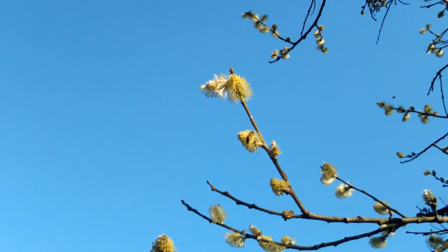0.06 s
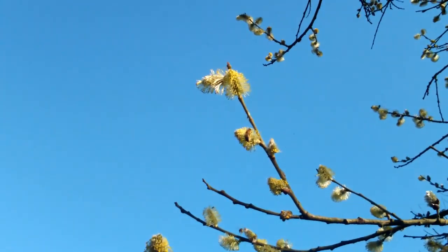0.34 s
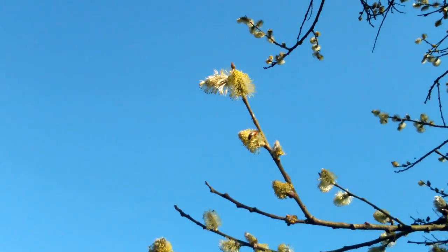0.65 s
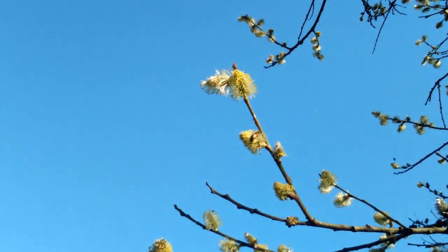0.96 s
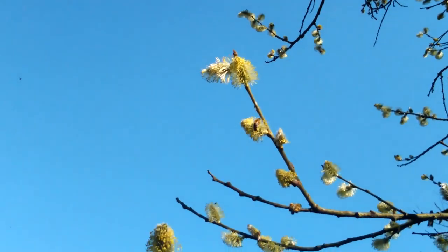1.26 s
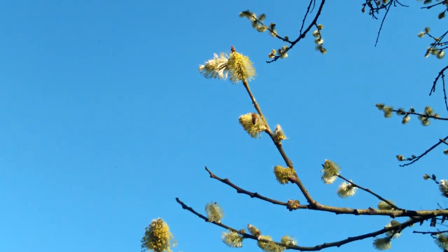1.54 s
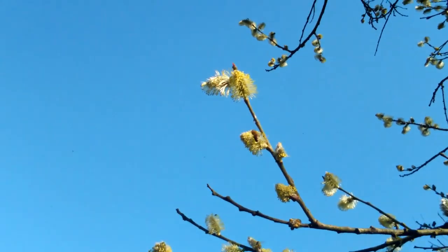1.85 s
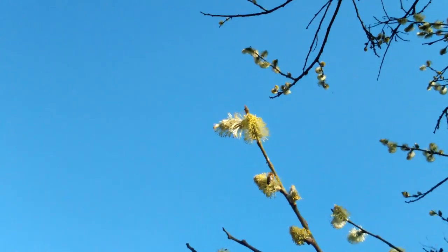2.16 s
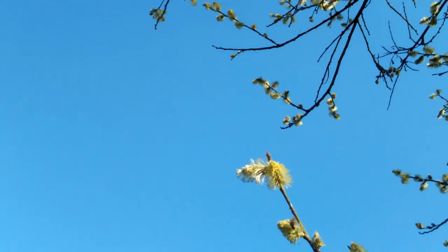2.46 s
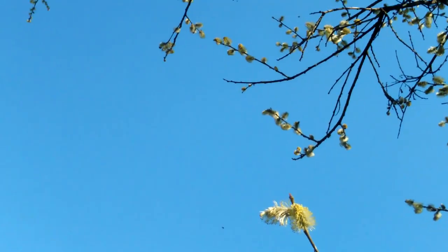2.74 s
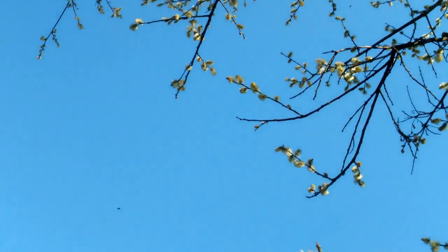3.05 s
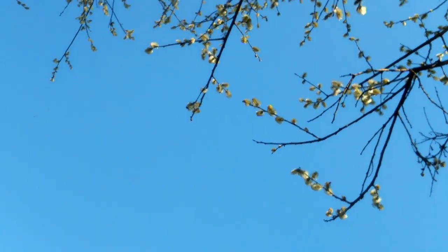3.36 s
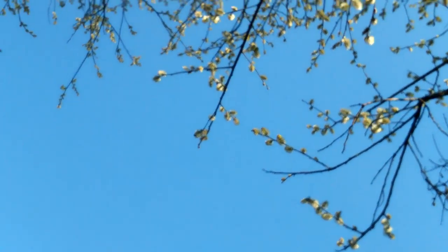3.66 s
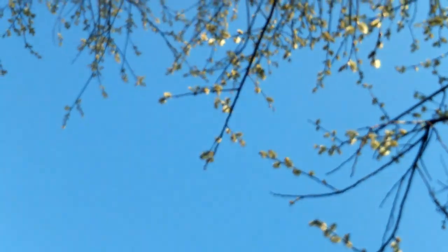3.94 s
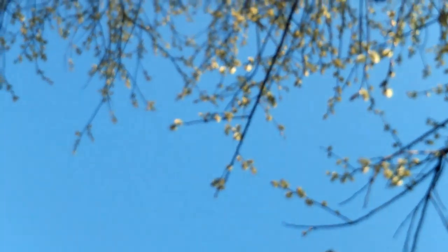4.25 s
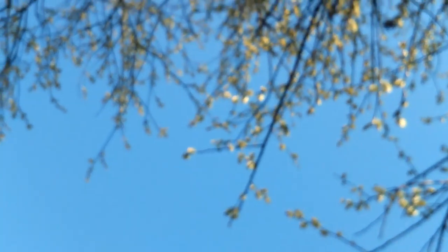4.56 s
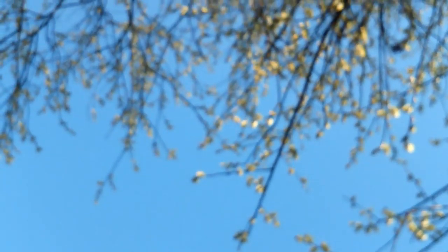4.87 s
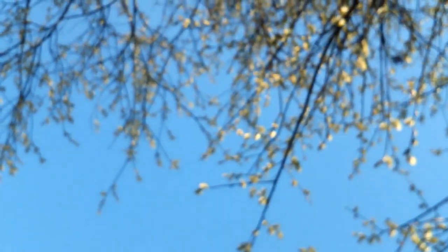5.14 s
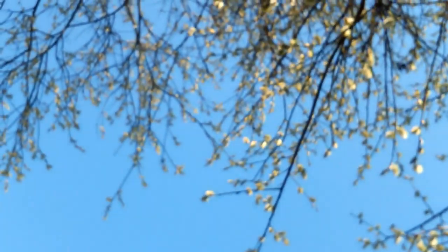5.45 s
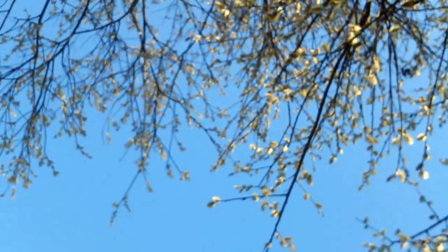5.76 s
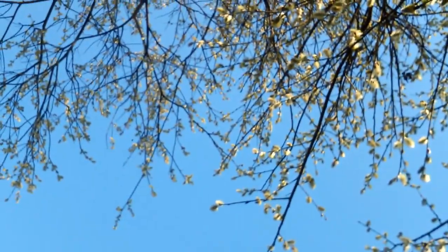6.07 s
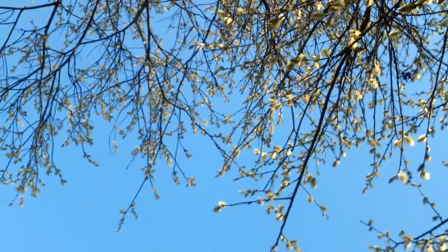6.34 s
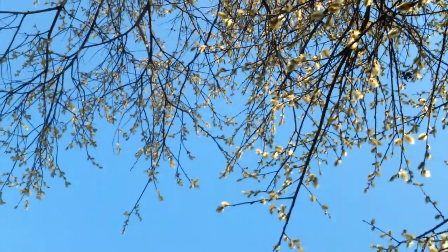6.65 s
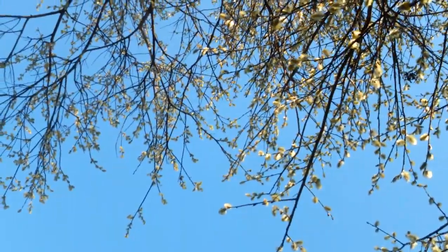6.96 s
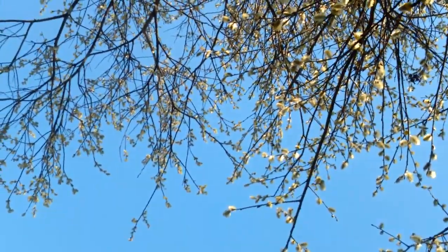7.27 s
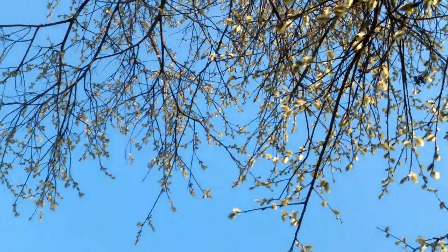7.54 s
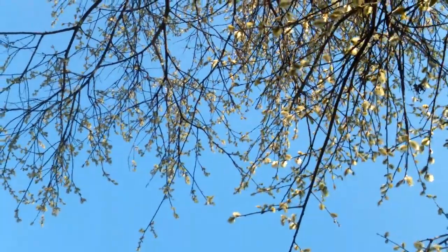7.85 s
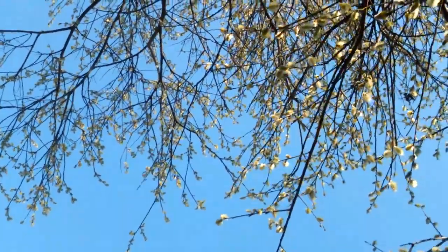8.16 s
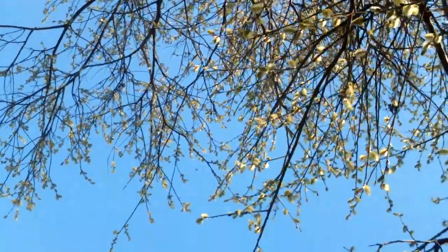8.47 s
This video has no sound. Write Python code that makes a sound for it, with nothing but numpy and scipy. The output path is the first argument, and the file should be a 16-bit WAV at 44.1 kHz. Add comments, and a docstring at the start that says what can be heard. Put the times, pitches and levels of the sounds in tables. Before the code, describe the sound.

Many bees hum softly and steadily throughout, some metres overhead in a flowering willow, blended with faint distant outdoor noise and a thin hiss. A light breeze rumbles on the hand-held microphone, louder than the bees. It starts with single low bumps around 1 second and a small puff at 2.5 seconds. From about 4.3 to 7 seconds it comes in short, fluttering gusts, and the strongest thump lands at 7.6 seconds, followed by a few lighter bumps. Right at the microphone, the hand makes small noises: a tiny bright tick at 0.7 seconds, two soft knocks just after 2 seconds, a sharper click at 3.4 seconds and a faint tick near 6.8 seconds. Around 8 seconds come a dull knock and a brief, faint finger rub, then more soft knocks and a tick at about 8.4 seconds.

```python
"""Dozens of bees work a flowering willow, their wingbeats merging into one soft hum.
The microphone is a hand-held phone some metres below them. A light breeze rises and falls on it,
bumping it with lone eddies and with gusts that are trains of eddies.
Far outdoor noise and the microphone's hiss lie beneath; right at the microphone,
the hand on the case makes a few ticks, knocks and short rubs."""
import sys
import numpy as np
from scipy import signal
from scipy.fft import rfft, irfft, next_fast_len
from scipy.io import wavfile

SR = 44100
rng = np.random.default_rng(int(sys.argv[2]) if len(sys.argv) > 2 else 0)


def transcribe(signal):
    """Save signal, clipped to [-1, 1], as a 16-bit WAV file at the path in sys.argv[1]."""
    frames = np.atleast_2d(signal).T
    limited = np.clip(frames, -1, 1)
    pcm = np.round(limited * 32767).astype(np.int16)
    wavfile.write(sys.argv[1], SR, pcm)


N = 379260
TIME = np.arange(N) / SR
HIGH_CUT_HZ = 15800
GUST_SAG_DB_PER_S = 11

# far outdoor noise: frequency_hz, relative_db
FAR_SPECTRUM = [(30, -16), (80, 11), (170, 3), (340, 0.5), (600, -2.5), (800, -2), (1100, 0.5), (1500, -2),
                (2000, -5), (2700, -10), (3400, -11), (4500, -19.5), (8000, -29.5)]
# its slow swell: time_s, level_db
FAR_SWELL = [(0, -60.5), (2.0, -61.5), (5.2, -60.5), (7.15, -58.7), (7.7, -61.5), (8.6, -61)]
# the microphone's own hiss: frequency_hz, relative_db
HISS_SPECTRUM = [(100, -13.5), (3000, -2), (5500, -3), (7000, -2), (8700, -0.5), (11000, -1.2), (13000, -1),
                 (15500, -3.5)]
# ticks of the case: start_s, peak_db, centre_hz
CASE_TICKS = [(.7070, -40, 10000), (3.4157, -29, 9400), (5.1854, -54, 12460), (6.765, -48, 10490),
              (7.9215, -52, 10000), (8.4317, -35.5, 12500)]
# soft knocks of a finger: start_s, peak_db
FINGER_KNOCKS = [(2.05, -44), (2.232, -44), (3.417, -46), (7.9213, -35.5), (8.355, -43), (8.434, -47)]
# the ring of the knocked case: pitch_hz, relative_db, t60_s
CASE_MODES = [(200, -7, .06), (330, 1, 0.029), (990, 0.5, 0.0055), (1630, 3, 0.0061), (2940, -22, 0.004)]
# a finger sliding on the case: start_s, length_s, level_db
FINGER_RUBS = [(7.95, 0.2, -58.5), (8.34, 0.019, -59)]
# its dull scrape: frequency_hz, relative_db
SCRAPE_SPECTRUM = [(200, 4), (800, -4), (1700, -1), (3000, -6), (5000, -14.5), (12000, -34)]
# its bright skin hiss: frequency_hz, relative_db
SKIN_SPECTRUM = [(4000, -26), (7000, -9), (9500, -1), (12000, -9), (15000, -14)]
# the breeze on the microphone: time_s, level_db
BREEZE_LEVEL = [(0, -61), (2.1, -58.5), (2.62, -47), (3.15, -54.5), (4.0, -52.5), (4.8, -44.5),
                (5.15, -48.5), (5.8, -48.5), (6.42, -41.5), (6.62, -48), (7.5, -51.5), (7.72, -46),
                (7.92, -50.5), (8.6, -52)]
# its rumble: frequency_hz, relative_db
RUMBLE_SPECTRUM = [(15, -31), (28, -34), (40, -1.5), (54, 6.5), (75, -1.5), (105, -9.5), (150, -15.5),
                   (220, -26), (350, -51), (700, -67)]
# lone eddies bumping the microphone: centre_s, peak_db, pitch_hz
LONE_EDDIES = [(0.862, -39.5, 73), (1.12, -33, 96), (1.445, -39, 69), (1.785, -48, 72), (2.55, -33.5, 72.5),
               (3.457, -38.5, 64.7), (3.746, -42, 66), (4.145, -37, 61), (4.345, -35.5, 77.5),
               (4.87, -33, 70.6), (5.253, -32, 85), (6.665, -39.5, 67.95), (6.866, -35.5, 68),
               (7.0, -38, 66), (7.226, -38, 83.9), (7.363, -37.5, 80.5), (7.619, -23, 82.05),
               (7.841, -35.5, 58), (7.994, -38, 76.1), (8.205, -39, 70.4), (8.489, -37.5, 60.4)]
# fine whirls fluttering inside a fast eddy: frequency_hz, relative_db
WHIRL_SPECTRUM = [(70, -16), (140, 8), (200, 0.5), (300, -9), (380, -12.5), (520, -22), (900, -57)]
# gusts, each a swell of rumble with a train of eddies: start_s, length_s, first_eddy_db, pitch_hz
WIND_GUSTS = [(2.475, .06, -43.5, 102), (4.479, 0.19, -40.5, 68), (5.361, 0.24, -33.5, 74),
              (5.735, .15, -27.5, 68), (6.001, 0.23, -39, 72.15), (6.288, 0.23, -30.5, 72.6),
              (7.589, 0.136, -29.5, 89)]
# the bees overhead, heard from below: time_s, mean_wingbeat_hz, level_db
SWARM_HUM = [(0, 235, -63), (1.2, 233.5, -62), (1.9, 241.3, -62), (4.2, 239, -62.5), (5.5, 243.7, -63),
             (7.0, 237.1, -62), (8.6, 240.6, -62)]
# one honeybee's buzz: wingbeat_multiple, relative_db
BUZZ_HARMONICS = [(1, -2), (2, -1), (3, -9), (4, -17), (5, -13.5), (6, -13.5), (8, -19), (12, -28),
                  (16, -35)]


def undb(db):
    """Decibels to gain."""
    return 10 ** (np.asarray(db) / 20)


def unit(x):
    """Scale to rms 1."""
    return x / np.sqrt(np.mean(x ** 2))


def curve(rows, column=1):
    """One column of a table, joined by straight lines in time."""
    rows = np.array(rows)
    return np.interp(TIME, rows[:, 0], rows[:, column])


def colour(x, spectrum):
    """Filter a sound by rows of frequency_hz, relative_db; the result has rms 1."""
    hz, db = np.transpose(spectrum)
    size = next_fast_len(N)
    bin_hz = np.maximum(np.fft.rfftfreq(size, 1 / SR), 1)
    gain = undb(np.interp(np.log(bin_hz), np.log(hz), db))
    return unit(irfft(rfft(x, size) * gain, size)[:N])


def drift(per_s, size=512):
    """Random values, per_s a second, joined by lines; spread near 1."""
    position = TIME * per_s + rng.random()
    return np.sqrt(3 / 2) * np.interp(position, np.arange(size), rng.standard_normal(size))


def background(hiss_db=-64.5, swell_db=.5):
    """Far outdoor noise swells gently over the steady hiss of the microphone."""
    far = colour(rng.standard_normal(N), FAR_SPECTRUM) * undb(curve(FAR_SWELL) + swell_db * drift(4.6))
    return far + undb(hiss_db) * colour(rng.standard_normal(N), HISS_SPECTRUM)


def ticks_and_knocks(tick_t60_s=0.0028, tick_log_width=0.37, tick_body_db=-19):
    """The case snaps in tiny bright ticks with a faint broad body, and rings dully under a finger."""
    out = np.zeros(N)
    t = np.arange(SR // 10) / SR
    for start, db, hz in CASE_TICKS:
        snap = rng.standard_normal(len(t)) * undb(-60 * t / tick_t60_s)
        edges_hz = np.minimum(hz * np.exp([-tick_log_width, tick_log_width]), HIGH_CUT_HZ)
        bright = signal.sosfilt(signal.butter(4, edges_hz, "band", fs=SR, output="sos"), snap)
        add(out, start, bright + undb(tick_body_db) * snap, db)
    ring = sum(undb(db - 60 * t / t60) * np.sin(2 * np.pi * hz * t) for hz, db, t60 in CASE_MODES)
    for start, db in FINGER_KNOCKS:
        add(out, start, ring, db)
    return out


def add(out, start_s, sound, peak_db):
    """Mix a short sound in at a time and a peak level."""
    i = max(int(start_s * SR), 0)
    out[i:i + len(sound)] += (undb(peak_db) * sound / np.abs(sound).max())[:N - i]


def finger_rubs(grain_db=2, attack_s=0.012, release_s=0.013, sag_db_per_s=48,
                skin_db=-12.5, skin_rise_db_per_s=63):
    """Skin grips and slips on the case; a dull scrape fades into a brighter hiss as the finger lifts."""
    slips = rng.standard_normal(N) * undb(grain_db * drift(55))
    scrape, skin = colour(slips, SCRAPE_SPECTRUM), colour(slips, SKIN_SPECTRUM)
    out = np.zeros(N)
    for start, length, db in FINGER_RUBS:
        age = np.clip(TIME - start, 0, length)
        press = np.minimum(age / attack_s, 1)
        release = np.exp(-np.maximum(TIME - start - length, 0) / release_s)
        friction = scrape + undb(skin_db + skin_rise_db_per_s * age) * skin
        out += press * release * undb(db - sag_db_per_s * age) * friction
    return out


def gust_swell(relative_db=-8.5, edge_s=0.037):
    """Gain of the gusts' rumble: each swells quickly, sags while it blows and dies away."""
    gain = np.zeros(N)
    for start, length, eddy_db, _ in WIND_GUSTS:
        age = TIME - start
        blowing = np.clip(1 + np.minimum(age, length - age) / edge_s, 0, 1)
        gain += blowing * undb(eddy_db + relative_db - GUST_SAG_DB_PER_S * np.clip(age, 0, length))
    return gain


def gust_eddies(per_s=25, most=12, jitter=0.18, scatter_db=2.0, pitch_spread=0.11):
    """A gust hits hardest at its front, then sheds weaker eddies unevenly: centre_s, peak_db, pitch_hz."""
    rows = []
    for start, length, db, hz in WIND_GUSTS:
        for k, (late, strong, fast) in enumerate(rng.standard_normal((most, 3))):
            if k / per_s < length:
                age = (k + jitter * late) / per_s
                peak_db = db - GUST_SAG_DB_PER_S * age + scatter_db * strong
                rows.append((start + age, peak_db, hz * np.exp(pitch_spread * fast)))
    return rows


def wind(flutter_db=2.0, eddy_width_cycles=0.66, whirl_db=-23, whirl_db_per_decade=60):
    """Turbulence rumbles on the microphone port; each eddy swings the pressure for a cycle or two."""
    breeze = undb(curve(BREEZE_LEVEL) + flutter_db * drift(11))
    buffeting = np.hypot(breeze, gust_swell()) * colour(rng.standard_normal(N), RUMBLE_SPECTRUM)
    whirls = colour(rng.standard_normal(N), WHIRL_SPECTRUM)
    whirl_gain = np.zeros(N)
    t = np.arange(-SR // 16, SR // 16) / SR
    for centre, db, hz in list(LONE_EDDIES) + gust_eddies():
        # an eddy arrives fast and leaves slower and deeper
        cycles = hz * t * (1 - 0.33 * np.tanh(hz * t))
        swell = np.exp(-.5 * (cycles / eddy_width_cycles) ** 2)
        add(buffeting, centre + t[0], swell * np.cos(2 * np.pi * (cycles + rng.random())), db)
        # faster eddies break up into more fine whirls
        add(whirl_gain, centre + t[0], swell, db + whirl_db + whirl_db_per_decade * np.log10(hz / 80))
    return buffeting + whirl_gain * whirls


def bees(count=40, stroke_samples=1024, spread=.053, wander=.031, waver=.011,
         distance_db=2.5, twigs_db=1.5):
    """Up in the willow each bee beats its wings at its own rate, speeding and slowing as it steers."""
    multiples, db = np.transpose(BUZZ_HARMONICS)
    harmonics = np.arange(1, round(multiples[-1]) + 1)
    strength = undb(np.interp(harmonics, multiples, db))
    cycles = np.outer(harmonics, np.arange(stroke_samples) / stroke_samples)
    mean_hz = curve(SWARM_HUM)
    # most bees beat near the mean rate, a few well above or below
    ranks = (np.arange(count) + .5) / count
    offsets = np.log(ranks / (1 - ranks)) * np.sqrt(3) / np.pi
    hum = np.zeros(N)
    for offset in offsets:
        stroke = strength @ np.sin(2 * np.pi * (cycles + rng.random((len(harmonics), 1))))
        wingbeat_hz = mean_hz * (1 + spread * offset + wander * drift(2.6) + waver * drift(17))
        beats = np.cumsum(wingbeat_hz) / SR + rng.random()
        # slow change of distance, quick flutter as it turns among the twigs
        gain = undb(distance_db * drift(1.244) + twigs_db * drift(11))
        hum += gain * stroke[(beats * stroke_samples).astype(int) % stroke_samples]
    return unit(hum) * undb(curve(SWARM_HUM, column=2))


def scene():
    """Everything reaches one microphone under the willow."""
    return (bees() + background() + ticks_and_knocks() + finger_rubs() + wind())[None]


def record(dry, low_cut_hz=35):
    """The phone cuts the deepest bass and the highest treble."""
    low_cut = signal.butter(3, low_cut_hz, "high", fs=SR, output="sos")
    high_cut = signal.ellip(10, .1, 70, HIGH_CUT_HZ, fs=SR, output="sos")
    return signal.sosfilt(high_cut, signal.sosfiltfilt(low_cut, dry, padtype="even"))


dry = scene()
out = record(dry)
transcribe(out)
```